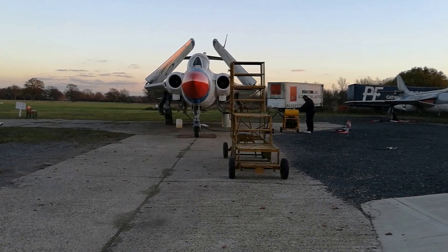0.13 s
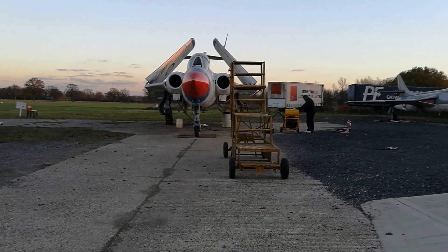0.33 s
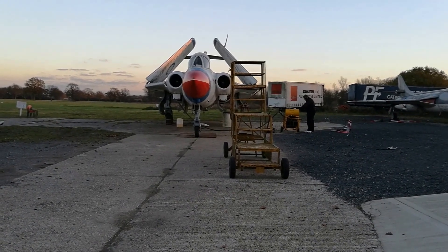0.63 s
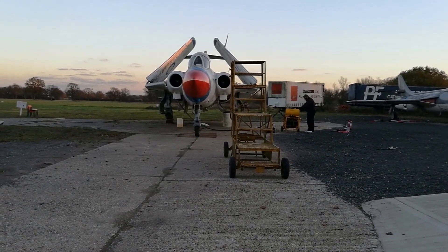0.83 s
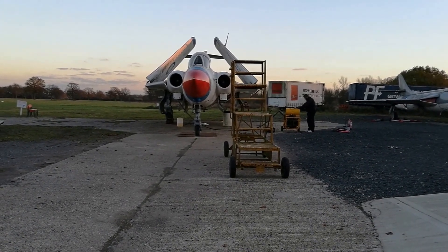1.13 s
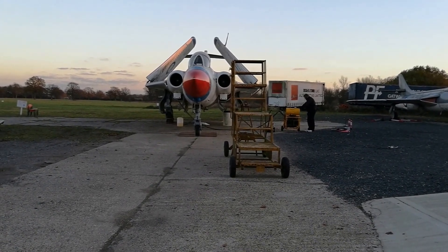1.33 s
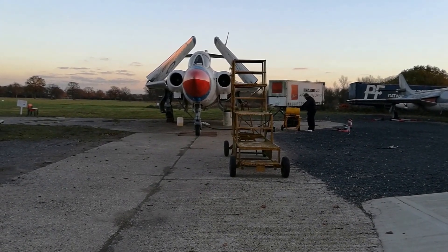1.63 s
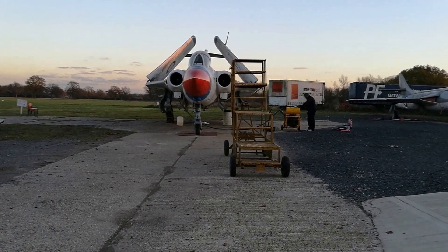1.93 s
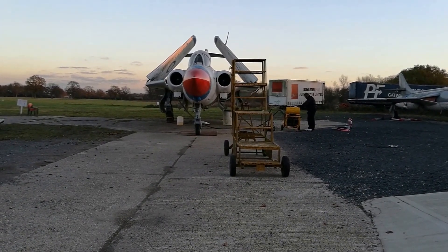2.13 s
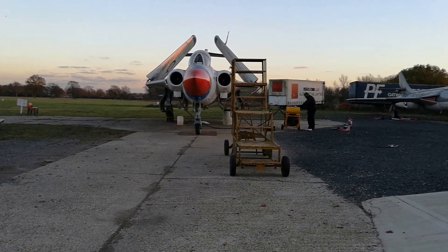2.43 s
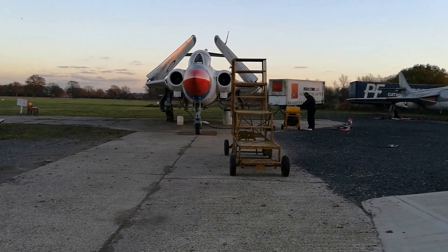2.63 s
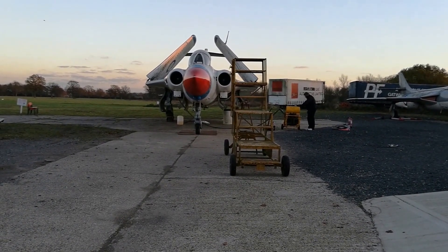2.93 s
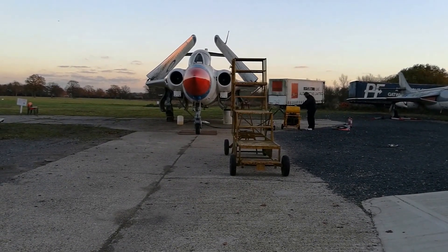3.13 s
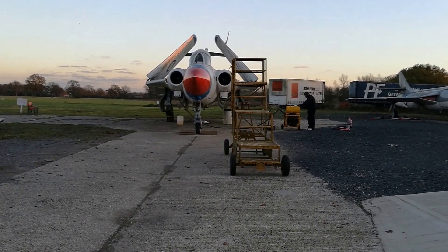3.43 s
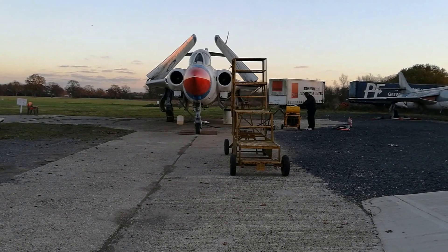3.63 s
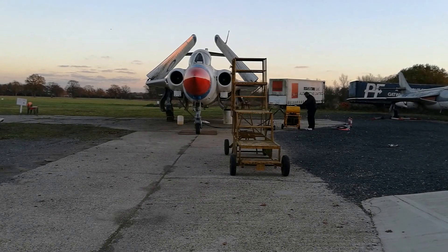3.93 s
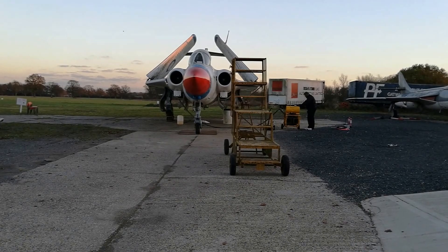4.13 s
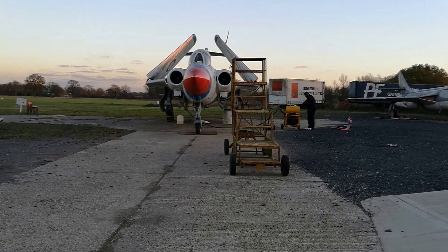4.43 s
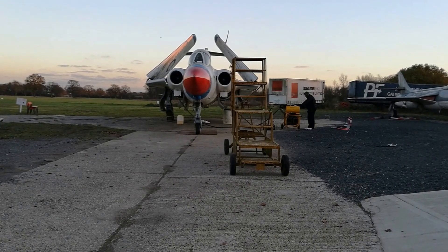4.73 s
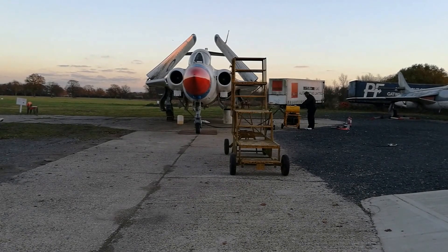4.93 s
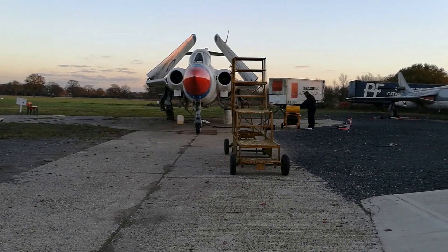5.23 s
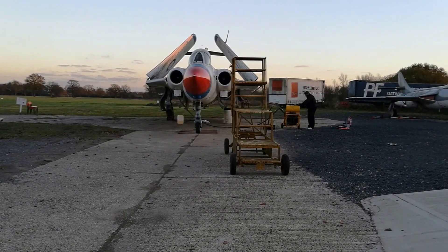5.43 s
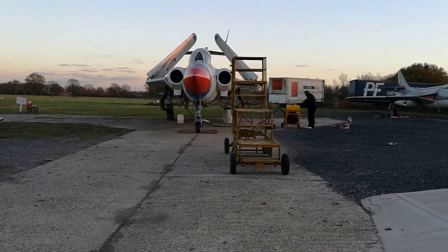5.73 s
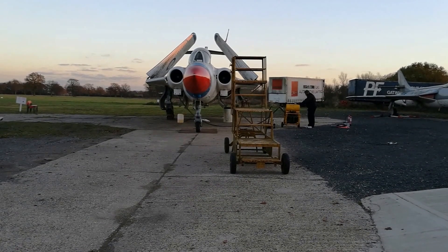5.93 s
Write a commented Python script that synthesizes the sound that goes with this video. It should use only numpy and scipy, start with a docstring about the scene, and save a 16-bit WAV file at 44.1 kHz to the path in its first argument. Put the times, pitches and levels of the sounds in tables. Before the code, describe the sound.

On an open airfield, a jet engine turns on its starter without lighting. A shrill, nearly pure whine climbs steadily over rumbling, hissing air, becoming piercing and clipped around two to four seconds, mainly on the left. Higher tones swell and fade, soft low thumps appear, and near five seconds the camera microphone overloads into a rough crackling roar on both sides.

```python
"""A parked jet turns on its starter, unlit, on an open apron, and its spin-up quickens throughout.
Rotor harmonics, sines of one accelerating phase, climb together over shaped noise: the air's rush.
Upper blade tones swell and fade in turn; soft low thumps, bursts of deep noise, come from two seconds on.
The whine peaks between two and four seconds and clips in the camera's left port, which takes most of it.
Rasp from the overloaded ports, one-sided crackle, comes and goes, then roars from near five seconds on."""
import sys
import numpy as np
from scipy import signal
from scipy.fft import rfft, irfft
from scipy.io import wavfile

SR = 44100
rng = np.random.default_rng(int(sys.argv[2]) if len(sys.argv) > 2 else 0)


def materialize(psi):
    """Save the field psi as 16-bit PCM at rate SR to the path in sys.argv[1].

    A 1-D psi becomes a single channel; in a 2-D psi each row is a channel.
    """
    bounded = np.clip(np.atleast_2d(psi).T, -1, 1)
    quanta = np.round(bounded * 32767).astype(np.int16)
    wavfile.write(sys.argv[1], SR, quanta)


N = 267687
TIME = np.arange(N) / SR  # s
BINS = np.maximum(np.fft.rfftfreq(N, 1 / SR), 1)  # Hz
START_HZ = 1115.55  # base blade rate at the start; every tone is a multiple of it

# air flow, relative to the air's spectra:
# (time [s], rumble [dB], intake [dB], hiss [dB], added to all three at the right port [dB])
AIR_FLOW = [(0, 6.5, 2, -2, 1), (.75, 3, -0.5, -2, 0), (1.15, -2, -4.5, -6.5, -0.5),
            (2, -0.5, -3.5, -5, .5), (2.6, -1.5, -3.5, -5, 3), (3, -4, -1, -1.5, 1.5),
            (3.75, 2, -.5, 0.5, 2), (4, 5.5, 2, 1.5, -0.5), (4.3, 6, 3.5, 5.5, -1.5),
            (4.78, 7, -0.5, 2.5, 2.5), (5.02, -5.5, -11, 0, 16), (5.23, 12.5, -1, 6, 4.5),
            (5.52, 9.5, -2.5, 3, 5.5), (5.75, 9.5, 0, 6.5, 4.5), (6.07, 6.5, -1, 5.5, 5.5)]
# how the two ports hear the same sound:
# (frequency [Hz], left lead [rad], likeness before the blend exponent [0-1])
PORT_PAIR = [(40.0, 0.1, 1), (200.0, 0.7, 0.75), (452, 2.05, 1), (760, 2.85, 0.24), (980, 4.66, 0.07),
             (1500.0, 6.9, 1), (2550, 8.72, 0.56), (3130, 8.44, 0.2), (3330, 6.05, 0.78),
             (4360, 3.32, 0.28), (6520, 3.4, 0.18), (7130, 5.18, 0.9), (9700, 4.85, 0.4), (15000.0, 6.7, 0)]


def undb(db):
    """Level is logarithmic: 20 dB is a factor of ten in amplitude."""
    return 10 ** (np.asarray(db) / 20)


def curves(table):
    """Slow change is linear between the rows of a time table: its columns, one value per sample."""
    s, *columns = np.transpose(table)
    return np.array([np.interp(TIME, s, c) for c in columns])


def spectra(table):
    """Spectra run straight over log frequency: the columns of a frequency table, one value per bin."""
    hz, *columns = np.transpose(table)
    return np.array([np.interp(np.log(BINS), np.log(hz), c) for c in columns])


def walk(rate):
    """Low-passed white noise is a smooth random motion: spread 1, up to about `rate` times a second."""
    size = 2 ** 15
    hz = np.fft.rfftfreq(size, TIME[-1] / size)
    smooth = irfft(rfft(rng.standard_normal(size)) / (1 + (hz / rate) ** 2))
    return np.interp(TIME, np.linspace(0, TIME[-1], size), smooth / smooth.std())


def at_ports(shared, own, spectrum, edge_db, blend):
    """Partial coherence: the right port hears a phase-shifted share of the left's noise, plus its own.

    The spectrum falls by edge_db per octave outside its table; a smaller blend makes the ports more alike.
    """
    lead, likeness = spectra(PORT_PAIR)
    likeness = np.clip(likeness, .01, 1) ** blend
    left = rfft(shared)
    right = likeness * np.exp(-1j * lead) * left + np.sqrt(1 - likeness ** 2) * rfft(own)
    nearest_hz = np.clip(BINS, spectrum[0][0], spectrum[-1][0])
    octaves_outside = np.abs(np.log2(BINS / nearest_hz))
    gain = undb(spectra(spectrum) - edge_db * octaves_outside)
    # the last factor turns unit-power white noise into unit power per Hz
    return irfft(np.array([left, right]) * gain, N) * np.sqrt(SR / 2)


def tone(phase, flutter, flutter_hz, skirt_db, skirt_hz):
    """Turbulence modulates a sine of rms about 1: slow flutter, and fast noise that spreads a skirt."""
    slow = flutter * (walk(flutter_hz) + 1j * walk(flutter_hz))
    fast = undb(skirt_db) * (walk(skirt_hz) + 1j * walk(skirt_hz))
    scale = np.sqrt(2 / (1 + 2 * flutter ** 2))
    return scale * np.imag((1 + slow + fast) * np.exp(1j * phase))


def swell(s, half_length):
    """A Gaussian envelope: top of 1 at time s, down to 1/e a half length away."""
    return np.exp(-((TIME - s) / half_length) ** 2)


def with_swells(multiple, db):
    """Powers add: a tone's running level plus its brief swells."""
    # (multiple of the base rate, time [s], half length [s], left level [dB], right level [dB])
    tone_swells = [(4, 0.29, .14, -19.5, -31), (4, 0.893, .17, -18.5, -26), (7, 1.05, .15, -34, -49),
                   (6, 1.5, 0.22, -33, -47), (7, 2.3, 0.17, -25.5, -39), (5, 2.41, 0.084, -27, -32),
                   (1, 2.67, .22, -34.5, -56), (6, 2.68, .17, -33, -49), (3, 2.8, .4, -35, -48),
                   (5, 2.95, .12, -16, -26), (6, 3.4, .2, -36, -55), (1, 3.55, .3, -35, -55),
                   (4, 4.58, 0.2, -15.5, -26), (6, 4.6, .17, -24, -40), (5, 4.85, 0.22, -27, -28),
                   (1, 4.9, .14, -22.5, -41), (3, 4.92, 0.17, -24, -40), (4, 5.007, 0.24, -12, -17),
                   (6, 5.12, 0.22, -37, -27), (3, 5.44, 0.19, -22, -18.5), (5, 5.48, .13, -21, -29),
                   (6, 5.54, .16, -30, -27), (3, 5.95, 0.2, -22, -23)]
    power = undb(db) ** 2
    for which, s, half_length, left_db, right_db in tone_swells:
        if which == multiple:
            power = power + (undb([[left_db], [right_db]]) * swell(s, half_length)) ** 2
    return np.sqrt(power)


def whine(turn, rate):
    """Blade passing in the first compressor stage: a strong, nearly pure tone at twice the base rate."""
    # mean level of the whine: (time [s], left level [dB], right level [dB], left lead [rad])
    whine_course = [(0, -20, -28, 2.2), (.3, -19, -24, 1.64), (.66, -23, -27.5, 3.5),
                    (.84, -12.5, -20.5, 3), (1.03, -11.5, -19, 4), (1.53, -14, -27, 2.5),
                    (2.03, -4, -22, 4), (2.74, -2, -22.5, 1.5), (2.95, -10, -25, 2.9), (3.1, -4, -33, 0),
                    (3.3, -3, -19.5, 0.5), (3.87, -4.5, -13.5, 0.95), (4, -17, -25.5, 0.9),
                    (4.7, -27, -27.5, -1.8), (4.84, -16, -14.5, -2), (4.97, -33, -10, -2),
                    (5.33, -31, -27, -3.5), (5.58, -16.5, -24, -3), (6.07, -24.5, -30, -4.5)]
    waver_above_hz, waver_db = 3700, 2.5  # above the intake's band the whine wavers
    left_db, right_db, lead = curves(whine_course)
    phase = np.array([2 * turn, 2 * turn - lead])
    clean = tone(phase, flutter=0.075, flutter_hz=22, skirt_db=-17, skirt_hz=182)
    waver_share = 1 / (1 + (waver_above_hz / (2 * rate)) ** 20)
    waver = waver_db * np.array([walk(7.4), walk(7.7)]) * waver_share
    return clean * undb(np.array([left_db, right_db]) + waver)


def upper_tones(turn, rate):
    """Harmonics filtered by the intakes: rougher tones of later stages and mixtures swell in duct modes."""
    # before the outlet: (multiple of the base rate, left level [dB], right level [dB])
    blade_tones = [(3, -30, -44), (4, -28, -37), (5, -30, -42), (6, -40, -54), (7, -40, -54), (8, -38, -57),
                   (9, -50, -61), (10, -50, -61)]
    # how well the intakes let these tones out: (frequency [Hz], level [dB])
    outlet = [(3300, -6), (3900, -18), (4500, -4.5), (5400, -7.5), (6500, -18.5), (7600, -0.5), (9500, -2),
              (12000, -6), (15500, -12)]
    fading_db = 5  # spread of each tone's random fading
    port_lead, outlet_db = spectra(PORT_PAIR)[0], spectra(outlet)[0]
    total = 0
    for multiple, left_db, right_db in blade_tones:
        hz = multiple * rate
        shared_db = np.interp(hz, BINS, outlet_db) + fading_db * walk(2.6)
        audible = hz < SR / 2  # nothing above half the sample rate
        gain = audible * with_swells(multiple, np.array([[left_db], [right_db]]) + shared_db)
        phase = np.array([multiple * turn, multiple * turn - np.interp(hz, BINS, port_lead)])
        # turbulence shakes short waves more than long ones
        total = total + gain * tone(phase, flutter=0.043 * multiple, flutter_hz=6.9,
                                    skirt_db=-14, skirt_hz=110)
    return total


def shaft(turn, rate):
    """Resonance: the rotor's hum, an eighth of the base rate, is strongest as it sweeps through a duct mode."""
    order = 1 / 8
    top_db, resonance_hz, width_hz = -39.5, 216.3, 13
    gain = undb(top_db) / np.hypot(1, 2 * (order * rate - resonance_hz) / width_hz)
    phase = np.array([order * turn, order * turn - .7])  # right lags by 0.7 rad
    return gain * tone(phase, flutter=0.4, flutter_hz=7.3, skirt_db=-20, skirt_hz=25)


def air():
    """Turbulent flow is broadband noise: low starter-air rumble, intake howl near 3 kHz, blade hiss above 7."""
    # spectra before the flow levels: (frequency [Hz], left [dB per Hz], right [dB per Hz])
    rumble = [(35, -79, -79), (140, -78.5, -79.5), (242, -68.5, -70), (338, -75.5, -74), (467, -65, -70.5),
              (620, -67.5, -76), (800, -68.5, -74), (1010, -65, -74.5), (1230, -73, -78), (1730, -78, -75),
              (2400, -73, -91)]
    intake = [(1710, -117, -90), (2100, -69.5, -65), (2420, -52.5, -60), (2820, -44.5, -61.5),
              (3436, -48, -61), (3900.0, -66, -64.5), (4410, -58, -67), (4900, -56.5, -67),
              (5220, -62, -86), (5840, -70, -81), (7240, -78, -76)]
    hiss = [(5900, -98, -69), (6830, -69.5, -76), (7760, -55.5, -67), (8100, -55, -72), (9700, -58.5, -75),
            (10530, -60, -88), (12400, -71, -79), (15500.0, -79, -100.6)]
    *levels, right_extra_db = curves(AIR_FLOW)
    total = 0
    for db, spectrum in zip(levels, [rumble, intake, hiss]):
        noise = at_ports(*rng.standard_normal((2, N)), spectrum, edge_db=46, blend=0.37)
        unsteady_db = .5 * walk(2.4)
        total = total + noise * undb(np.array([db, db + right_extra_db]) + unsteady_db)
    return total


def duct():
    """Noise-driven resonance: starter air rings narrow, fixed duct modes, as loud as the rumble makes them."""
    # before the rumble's level: (frequency [Hz], width [Hz], left level [dB], right level [dB])
    modes = [(124, 22, -56.5, -57.5), (233, 39, -50, -49), (463, 35, -48.5, -53.5), (716, 41, -42.5, -54),
             (974, 116, -43, -56)]
    ring = 0
    for hz, width, left_db, right_db in modes:
        resonance = np.sqrt(SR / np.pi / width) / (1 + 2j * (BINS - hz) / width)
        trim = np.exp(-((BINS - hz) / (3 * width)) ** 2)  # cuts the far skirts
        ring = ring + undb([[left_db], [right_db]]) * resonance * trim
    lead = spectra(PORT_PAIR)[0]
    ports = np.array([np.ones(len(BINS)), np.exp(-1j * lead)])
    rumble_db = curves(AIR_FLOW)[0]
    return irfft(ring * ports * rfft(rng.standard_normal(N)), N) * undb(rumble_db)


def rasp(turn, rate):
    """Overload is nonlinear: the ports add dense one-sided crackle, and a difference tone grows with it."""
    # strength relative to the spectrum below: (time [s], left level [dB], right level [dB])
    overload = [(0, -32, -25), (1.8, -45, -32), (2.08, -20, -34), (2.55, -16.5, -22), (3.05, -12, -11.5),
                (3.22, -15, -18), (3.35, -8, -7.5), (3.86, -12, -14.5), (3.98, -35, -30), (4.17, -19, -14),
                (4.46, -20.5, -18), (4.55, -9, -9.5), (4.8, 0, 0), (4.95, 2, 1), (5.06, -2, -2),
                (5.25, 1.5, 0), (5.54, 3, 2.5), (5.72, -2.5, -3), (6.07, -3, -2)]
    # (frequency [Hz], left [dB per Hz], right [dB per Hz])
    rasp_spectrum = [(35.0, -52, -62), (130.0, -50.5, -51.5), (300.0, -50, -56.5), (690, -51.5, -57),
                     (1460, -47.5, -64), (2320, -49.5, -76), (4780, -49.5, -51), (6260, -55.5, -71),
                     (10100, -53, -58), (15400, -61, -79)]
    difference_db = [[-27.5], [-43]]  # left, right, against the overload strength
    top_hz, fade_hz = 2240, 30  # the difference tone dies away above this base rate
    overload_db = curves(overload)
    crackle = -np.maximum(rng.standard_normal((2, N)) - .7, 0)
    crackle = (crackle - crackle.mean()) / crackle.std()
    roar = at_ports(*crackle, rasp_spectrum, edge_db=0, blend=0.61) * undb(overload_db + walk(7.5))
    fade = 1 / (1 + np.exp((rate - top_hz) / fade_hz))
    difference = fade * tone(turn, flutter=0.22, flutter_hz=20, skirt_db=-7, skirt_hz=260)
    return roar + difference * with_swells(1, overload_db + difference_db)


def thumps():
    """Long waves reach both ports in phase: short swells of deep noise, the same in each."""
    # (time [s], half length [s], level at the top [dB])
    soft_thumps = [(1.933, .04, -49), (2.134, .03, -36.5), (3.04, .041, -38), (3.42, .07, -39),
                   (4.268, .06, -42), (4.677, .056, -33)]
    gain = sum(undb(db) * swell(s, half_length) for s, half_length, db in soft_thumps)
    band = BINS / (BINS + 20) / (1 + (BINS / 110) ** 4)  # about 20 to 110 Hz
    deep = irfft(rfft(rng.standard_normal(N)) * band, N)
    return gain * deep / deep.std()


def scene():
    """Phase is the integral of frequency: one accelerating rotor drives all tones, over the rushing air."""
    # the starter pulls harder as it goes: (time [s], rise of the base blade rate [Hz per s])
    spin_up = [(0, 99.46), (1.2, 129.88), (2.1, 160.83), (4.9, 296.99), (6.07, 379.38)]
    rate = START_HZ + np.cumsum(curves(spin_up)[0]) / SR  # Hz
    turn = 2 * np.pi * np.cumsum(rate) / SR  # rad
    tones = whine(turn, rate) + upper_tones(turn, rate) + shaft(turn, rate)
    return tones + air() + duct() + rasp(turn, rate) + thumps()


def record(dry):
    """Saturation: the camera clips at full scale with a slightly rounded knee, then cuts the top."""
    top_hz = 15700
    # clip at four times the sample rate, so that fewer new harmonics fold back
    fine = signal.resample_poly(dry, 4, 1, axis=1)
    rounded = fine / (1 + fine ** 16) ** (1 / 16)
    clipped = signal.resample_poly(rounded, 1, down=4, axis=1)
    low_pass = signal.ellip(10, .05, 50, top_hz, fs=SR, output="sos")
    return signal.sosfiltfilt(low_pass, clipped)


dry = scene()
out = record(dry)
materialize(out)
```